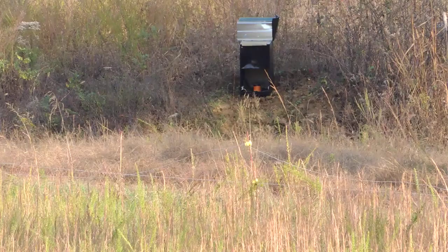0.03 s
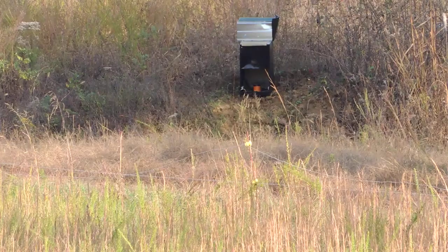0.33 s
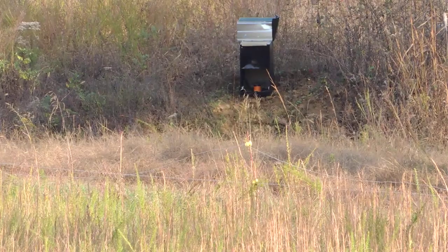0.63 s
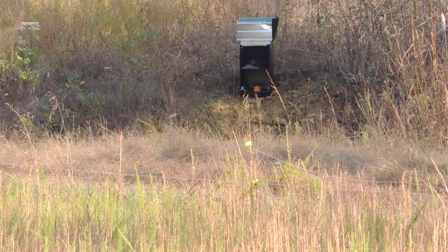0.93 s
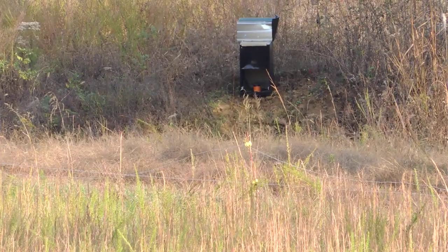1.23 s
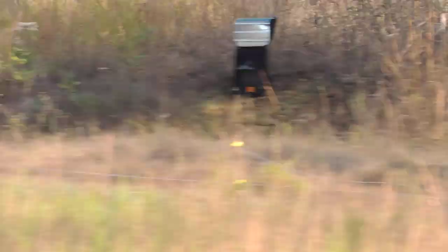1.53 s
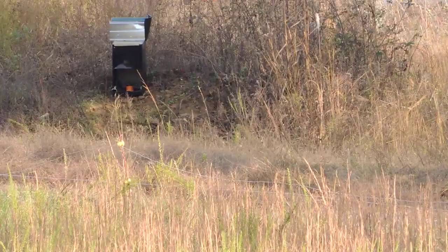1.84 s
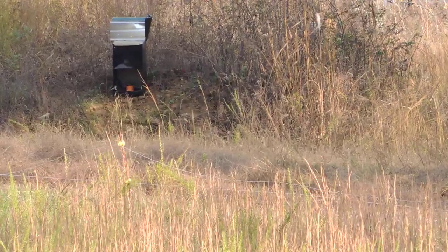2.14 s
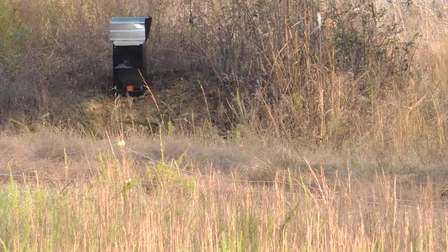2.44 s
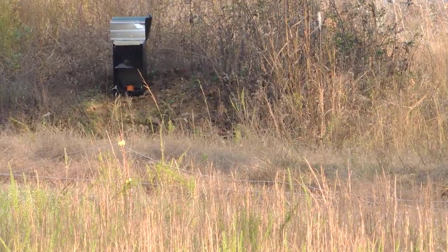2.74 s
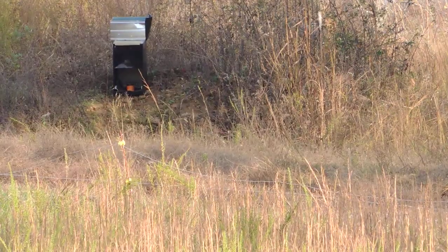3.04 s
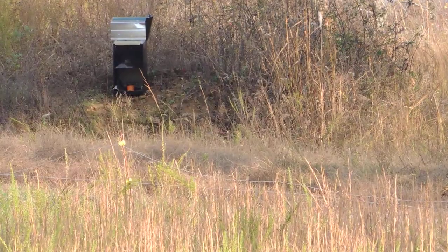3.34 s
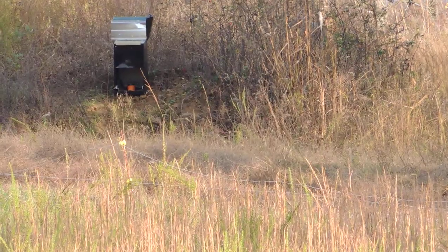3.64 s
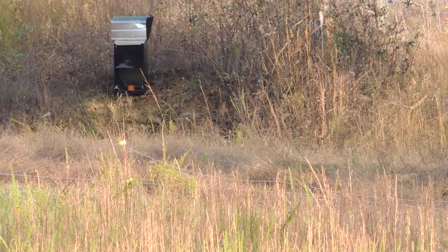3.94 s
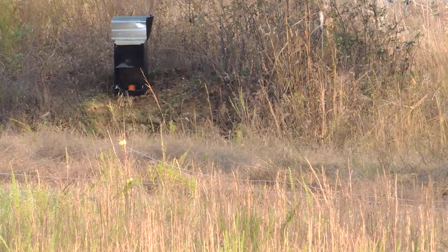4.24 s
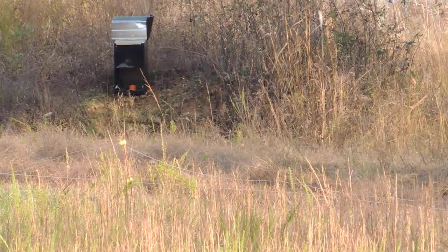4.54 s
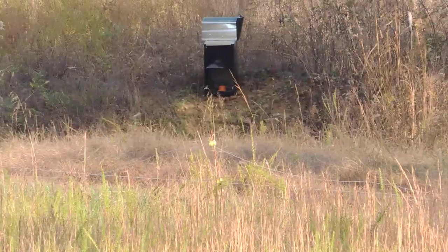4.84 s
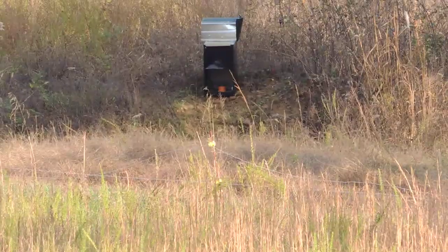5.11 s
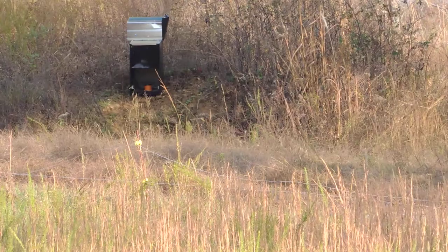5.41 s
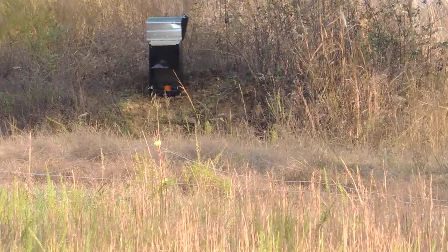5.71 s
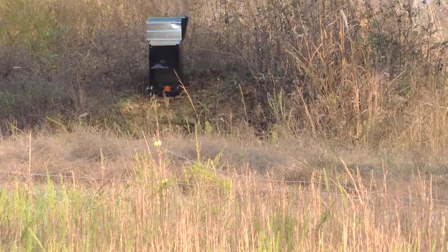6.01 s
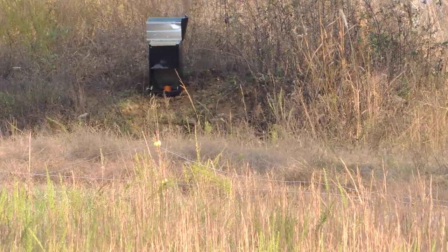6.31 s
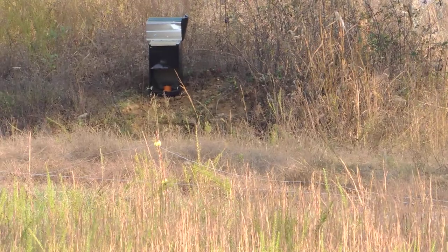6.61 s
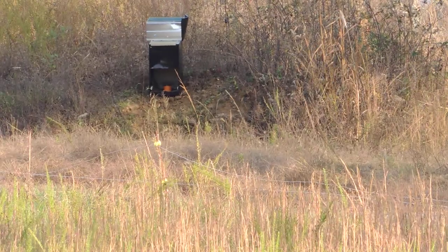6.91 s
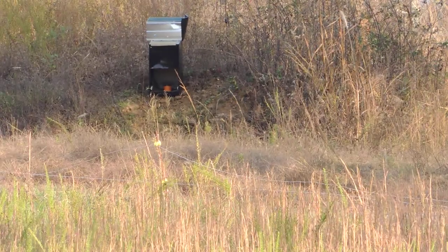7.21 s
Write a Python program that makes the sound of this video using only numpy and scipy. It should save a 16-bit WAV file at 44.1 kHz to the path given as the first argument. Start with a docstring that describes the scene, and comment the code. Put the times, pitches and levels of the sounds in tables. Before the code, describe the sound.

A faint breeze hisses through dry brush in an open field, with a brief rustle and soft wind bumps on the microphone. About four seconds in, one very loud rifle shot cracks and booms close by, briefly overloading the microphone. Quick echoes scatter back, growing duller, and a deep rumble follows. The quiet outdoor air returns with a faint, distant engine hum.

```python
"""Rifle shot across a dry field

One shot, fired close to a camera whose stereo microphones overload for a tenth of a second.
The boom and the crack scatter back from grass, brush and a bank, duller the further they have travelled,
and a deep rumble follows. Around it: a breeze, wind bumps, a few brief rustles and a distant engine."""
import sys
import numpy as np
from scipy import signal
from scipy.fft import rfft, irfft, next_fast_len
from scipy.io import wavfile
from scipy.ndimage import uniform_filter1d, minimum_filter1d

SR = 44100
rng = np.random.default_rng(int(sys.argv[2]) if len(sys.argv) > 2 else 0)


def log_audio(samples):
    """Write samples as a 16-bit WAV file to the path given in sys.argv[1]."""
    # one column per channel
    frames = np.atleast_2d(samples).T
    # limit to full scale, then quantise
    limited = np.clip(frames, -1, 1)
    pcm = np.round(limited * 32767).astype(np.int16)
    wavfile.write(sys.argv[1], SR, pcm)


N = 320166
TIME = np.arange(N) / SR
SIZE = next_fast_len(N, real=True)
FREQ = np.arange(SIZE // 2 + 1) * SR / SIZE
SHOT_S = 4.2465

# The boom beside the gun. Each row: frequency in Hz, relative level in dB.
NEAR_BOOM_SPECTRUM = [(25, -34), (90, -9), (170, -6), (290, 3), (430, -5), (620, -4), (900, -11.5),
                      (1800, -20.5), (4000, -27.5)]
# The crack as it leaves the muzzle. Each row: frequency in Hz, relative level in dB.
CRACK_SPECTRUM = [(100, -9), (500, -1.5), (1000, -1.5), (1900, 1.5), (3300, -0.5), (5500, -3.5),
                  (7500, -4.5), (10000, -7), (14000, -9)]


def muzzle_blast(push_s=0.0034, attack_s=.002, hold_s=0.054, decay_s=0.026):
    """Close up: the pressure front, its longer suction, and dense reflections from around the gun."""
    since = np.maximum(TIME - SHOT_S, 0)
    age = since / push_s
    front = undb(10) * (TIME > SHOT_S) * (1 - age) * np.exp(-np.minimum(age ** 2 / 4, 50))
    # the boom holds while the ground close by returns it
    held = (1 - np.exp(-since / attack_s)) * np.exp(-np.maximum(since - hold_s, 0) / decay_s)
    boom = undb(7.5) * held * even(stereo_noise(NEAR_BOOM_SPECTRUM, lag_s=0.000123), span_s=0.018)
    # the crack comes straight from the muzzle, then again off things near the gun
    direct = undb(10.5) * burst(SHOT_S, swell_s=0.00073, decay_s=0.0027)
    scatter = undb(11) * (TIME > SHOT_S) * burst(SHOT_S + 0.019, swell_s=0.0064, decay_s=0.028)
    grain = undb(3 * drift(500) + 2 * drift(150))
    crack = np.hypot(direct, scatter) * grain * stereo_noise(CRACK_SPECTRUM, lag_s=.00005)
    return front + boom + crack * undb([[0], [2]])  # it reaches the right microphone unshaded


# The boom as it returns from out in the field. Each row: frequency in Hz, relative level in dB.
FAR_BOOM_SPECTRUM = [(25, -19), (80, -19), (140, -1), (230, 0.5), (330, -9.5), (600, -18.5), (1000, -27),
                     (2500, -75)]
# Stretches of grass or brush, near to far. Each row: peak time in seconds, boom and crack levels
# in dB before air loss, crack tilt in dB per octave, swell and decay in seconds.
BRUSH_ECHOES = [(4.35, -9.5, -15.5, 5, .012, 0.082), (4.44, -32, -19, 16, .055, .022),
                (4.458, -14, -5, 3.2, 0.0092, 0.092), (4.6, -21, -10, 3, 0.047, 0.082),
                (4.72, -26.5, -22.5, -5, 0.034, .11), (4.89, -28, -32.5, -2.5, 0.028, 0.029),
                (5.033, -43, -27, 1.5, 0.044, 0.13), (5.13, -37, -29.5, -1, 0.046, 0.13),
                (5.36, -38.5, -34.5, -2, 0.056, 0.19)]
# Sharp echoes off larger faces. Each row: peak time in seconds, level in dB before air loss,
# swell and decay in seconds.
FACE_ECHOES = [(4.335, -0.5, 0.0079, .003), (4.495, -12, .0007, 0.0013), (4.592, -7, 0.0012, 0.0013),
               (4.622, -19, .001, 0.0018), (4.812, -22, 0.0011, 0.0029)]


def field_echoes(boom_lag_s=0.011):
    """Countless stalks and bushes each return a little of the shot; larger faces return single echoes."""
    boom_power, crack_power, weighted_tilt = 0, 1e-12, 0
    for s, boom_db, crack_db, tilt_db, swell, decay in BRUSH_ECHOES:
        boom_power += (undb(boom_db) * burst(s + boom_lag_s, swell, decay)) ** 2
        power = (undb(crack_db) * burst(s, swell, decay)) ** 2
        crack_power += power
        weighted_tilt += tilt_db * power
    boom = np.sqrt(boom_power) * even(stereo_noise(FAR_BOOM_SPECTRUM, lag_s=.00008), span_s=0.0234)
    scatter = np.sqrt(crack_power) * undb(2 * drift(700) + 1.5 * drift(70))
    faces = swells(FACE_ECHOES)
    crack = (scatter + faces) * stereo_noise(CRACK_SPECTRUM, lag_s=.00003)
    # whichever echo is loudest at the moment sets the brightness
    tilt = weighted_tilt / (crack_power + faces ** 2)
    return (TIME > SHOT_S) * (boom + air_loss(crack, tilt))


def air_loss(x, tilt, loss_db_per_s=30, at_hz=12000):
    """Air takes more treble the longer the sound has been under way; fine grass tilts it brighter."""
    hz, s, frames = signal.stft(x, SR, nperseg=256)
    travel_s = np.clip(s - SHOT_S, 0, .85)
    octaves = np.log2(np.clip(hz, 800, 6000) / 3500)[:, None]
    tilt_db = octaves * np.interp(s, TIME, tilt)
    loss_db = loss_db_per_s * travel_s * (hz[:, None] / at_hz) ** 1.48
    return signal.istft(frames * undb(tilt_db - loss_db), SR)[1][:, :N]


# Dull echoes off the slopes. Each row: centre in seconds, relative level in dB, pitch in Hz,
# width in seconds.
SLOPE_THUMPS = [(4.3213, 6.5, 180, 0.0058), (4.357, -1, 161, 0.0036), (4.472, 1, 229, 0.0023),
                (4.769, -11.5, 212, 0.0031), (5.048, -27.5, 480, 0.0043)]


def slope_echoes():
    """Broad slopes return only a few low swings of the blast, stronger on the left."""
    swings = sum(-undb(db) * bell(s, width) * np.cos(2 * np.pi * hz * (TIME - s))
                 for s, db, hz, width in SLOPE_THUMPS)
    return swings * np.array([[1.2], [.75]])


# The slap from downrange. Each row: frequency in Hz, relative level in dB.
SLAP_SPECTRUM = [(300, -20), (1200, -3), (1650, -11), (1900, -1), (2900, -1.5), (3500, -3), (4400, -12),
                 (6300, 0.5), (9000, -14), (14000, -28)]


def bank_slap(s=4.6516, snap_hz=2300):
    """The bank behind the target returns a short snap inside a spray of scatter."""
    scatter = even(stereo_noise(SLAP_SPECTRUM, lag_s=0), span_s=.003)
    spray = undb(-1) * burst(s + 0.0006, swell_s=0.0027, decay_s=0.0064) * scatter
    snap = undb(9) * burst(s, swell_s=.0001, decay_s=0.00094) * np.sin(2 * np.pi * snap_hz * (TIME - s))
    return spray + snap * np.array([[1.1], [.85]])


# Low buffets of moving air. Each row: frequency in Hz, relative level in dB.
BUFFET_SPECTRUM = [(15, -4.5), (35, 5.5), (70, -2), (150, -5.5), (260, -17.5), (600, -57)]
# Wind bumps, and a deep rumble after the shot. Each row: peak time in seconds, level on the left
# in dB, swell and decay in seconds.
BUFFETS = [(1.75, -33.5, 0.055, 0.097), (3.65, -25.5, 0.064, 0.07), (4.62, -11, 0.032, 0.054),
           (4.87, -19, 0.086, 0.2), (7.15, -29.5, 0.23, 0.33)]
# Single puffs on the microphones. Each row: centre in seconds, relative level in dB, width in seconds.
MIC_PUFFS = [(1.7297, -13, 0.0012), (3.604, -21, 0.0013), (3.662, -19, 0.0009), (3.679, -24, 0.0028),
             (6.986, -18, 0.00081)]


def low_buffets(lull_db=-45, flutter_db=3, right_db=-8):
    """Moving air: wind bumps, and a deep rumble after the shot, weaker in the right microphone."""
    rumble = np.array([stereo_noise(BUFFET_SPECTRUM)[0] for _ in range(2)])  # each side has its own
    buffet = np.hypot(undb(lull_db), swells(BUFFETS)) * undb(flutter_db * drift(25)) * rumble
    puffs = -1.5 * sum(undb(db) * bell(s, width) for s, db, width in MIC_PUFFS)
    return (buffet + puffs) * undb([[0], [right_db]])


# Wind out in the brush. Each row: frequency in Hz, relative level in dB.
BREEZE_SPECTRUM = [(200, -18), (450, -8.5), (620, 0), (820, 1.5), (1050, -3), (1500, -13.5), (3000, -20),
                   (12000, -60.5)]
# Its gusts. Each row: peak time in seconds, level in dB, swell and decay in seconds.
BREEZE_GUSTS = [(.62, -40, 1.8, 1.1), (3.92, -39.5, 0.3, 0.16), (7.24, -41.5, .18, .3)]


def breeze(lull_db=-56, flutter_db=1.36):
    """Air hisses through the brush, rising in gusts out of a faint lull."""
    level = np.hypot(undb(lull_db), swells(BREEZE_GUSTS)) * undb(flutter_db * drift(12))
    return level * stereo_noise(BREEZE_SPECTRUM)


# A dry rustle at close range. Each row: frequency in Hz, relative level in dB.
RUSTLE_SPECTRUM = [(300, -8), (550, -5), (760, 3), (1100, 1.5), (1850, 4), (2800, -1), (4500, -12),
                   (6000, -11), (8000, -18), (14000, -19)]
# The scuffs. Each row: peak time in seconds, level in dB, swell and decay in seconds.
SCUFFS = [(0.7672, -28, 0.0024, 0.0058), (.783, -36, .004, .01), (2.02, -44, .006, .012),
          (2.285, -46, .005, .01), (2.44, -46.5, .04, 0.065)]


def rustles():
    """Brief dry scuffs beside the camera."""
    return stereo_noise(RUSTLE_SPECTRUM) * swells(SCUFFS)


# The engine, far off and stronger on the left. Each row: time in seconds, relative level in dB.
ENGINE_LEVELS = [(0, -60), (4, -50.5), (5.1, -41), (6.2, -45.5), (6.9, -38.5), (7.26, -43.5)]


def distant_engine(firing_hz=112.5, waver=0.0206, flutter_db=3):
    """Only the engine's wavering firing tone carries this far."""
    phase = 2 * np.pi * np.cumsum(firing_hz * (1 + waver * drift(10))) / SR
    level_db = np.interp(TIME, *np.transpose(ENGINE_LEVELS)) + flutter_db * drift(9)
    return np.sqrt(2) * undb(level_db) * np.sin(phase) * np.array([[1.25], [.75]])


# The open field's background. Each row: frequency in Hz, relative level in dB.
AIR_SPECTRUM = [(12, -36), (20, -9.5), (77, -5), (112, -1.5), (148, -7.5), (200, -7.5), (365, -18),
                (494, -21), (650, -20.5), (832, -20.5), (980, -15), (1160, -21), (1520, -19.5),
                (3100, -32.5), (14000, -39.5)]


def open_air(level_db=-37.5):
    """Nearly steady rumble and hiss from far away."""
    return undb(level_db + .5 * drift(5.17)) * stereo_noise(AIR_SPECTRUM)


# How alike the two microphones hear the field. Each row: frequency in Hz, correlation from 0 to 1.
MIC_LIKENESS = [(40, 1), (130, 1), (300, 0.99), (650, 0.99), (1400, 0.46), (3000, 0.079), (12000, 0.023)]
# The pair's balance. Each row: frequency in Hz, level of left over right in dB.
LEFT_LEAN = [(100, 4.5), (1000, 5), (3000, 5), (7000, 2), (14000, 0.3)]


def stereo_noise(spectrum, lag_s=0.00014):
    """Coloured noise of rms 1 at the microphones: alike in the bass, louder and lag_s later on the left."""
    mid, side = rfft(rng.standard_normal((2, SIZE)))
    alike = np.clip(at_freq(MIC_LIKENESS), 0, .995)
    lean = undb(at_freq(LEFT_LEAN) / 2)
    mid, side = mid * np.sqrt(1 + alike), side * np.sqrt(1 - alike)
    left = (mid + side) * lean * np.exp(-2j * np.pi * FREQ * lag_s)
    right = (mid - side) / lean
    x = irfft(np.array([left, right]) * undb(at_freq(spectrum)), SIZE)[:, :N]
    return x / x.std()


def undb(db):
    """Decibels to gain."""
    return 10 ** (np.asarray(db) / 20)


def at_freq(table):
    """Rows of frequency and value, joined on a log-frequency axis."""
    hz, value = np.transpose(table)
    return np.interp(np.log(FREQ + 1), np.log(hz), value)


def drift(rate_hz):
    """Random levels joined smoothly, spread near 1."""
    knots = rng.standard_normal(int(N / SR * rate_hz) + 2)
    joined = np.interp(TIME * rate_hz, np.arange(len(knots)), knots)
    return uniform_filter1d(joined, int(SR / rate_hz / 2))


def even(x, span_s):
    """Noise with its chance swells ironed out over span_s."""
    return x / np.sqrt(uniform_filter1d(np.mean(x ** 2, axis=0), int(span_s * SR)) + 1e-9)


def bell(s, width_s):
    """Smooth bump centred on time s."""
    return np.exp(-.5 * np.minimum(((TIME - s) / width_s) ** 2, 100))


def burst(s, swell_s, decay_s):
    """Envelope that swells up to time s and dies away after it."""
    return np.exp(-np.minimum(np.maximum((s - TIME) / swell_s, (TIME - s) / decay_s), 20))


def swells(table):
    """Joint envelope of a table of bursts; their powers add."""
    return np.sqrt(sum((undb(db) * burst(s, swell, decay)) ** 2 for s, db, swell, decay in table))


def scene():
    """The shot, its echoes and the open field, heard from beside the gun."""
    shot = muzzle_blast() + field_echoes() + slope_echoes() + bank_slap()
    return shot + open_air() + breeze() + low_buffets() + distant_engine() + rustles()


def gain_control(x, limit_db=-3, depth_db=8, hold_s=0.74, attack_s=0.018, release_s=0.5):
    """An overload turns the camera's gain down; it stays down for a while and then creeps back."""
    power = uniform_filter1d(np.mean(x ** 2, axis=0), int(.02 * SR))
    over_db = np.clip(10 * np.log10(np.abs(power) + 1e-12) - limit_db, 0, depth_db)
    half = int(hold_s * SR / 2)
    held_db = -minimum_filter1d(-over_db, 2 * half + 1, origin=half, mode="constant")
    recovery_db = TIME * depth_db / release_s
    cut_db = np.maximum.accumulate(held_db + recovery_db) - recovery_db
    pole = np.exp(-1 / (attack_s * SR))
    return x * undb(-signal.lfilter([1 - pole], [1, -pole], cut_db))


def record(dry, start_s=.106, ceiling=.92, top_hz=14300):
    """The camera starts, rides its gain, clips the blast flat and cuts the top."""
    x = gain_control(dry) * (TIME > start_s)
    clipped = x / (1 + (x / ceiling) ** 6) ** (1 / 6)
    lowpass = signal.ellip(8, .05, 50, top_hz, fs=SR, output="sos")
    return signal.sosfiltfilt(lowpass, clipped)


dry = scene()
out = record(dry)
log_audio(out)
```